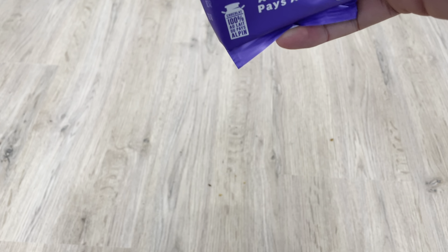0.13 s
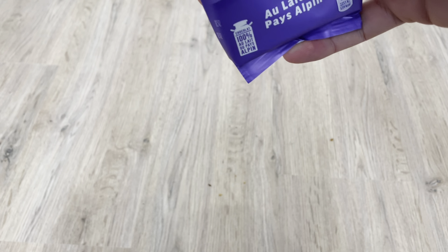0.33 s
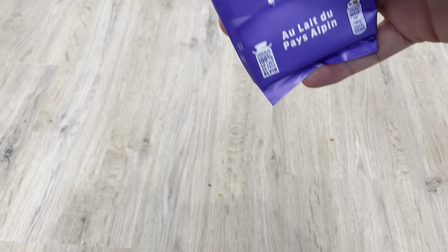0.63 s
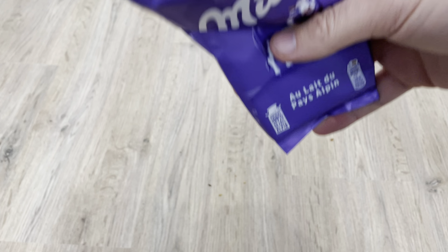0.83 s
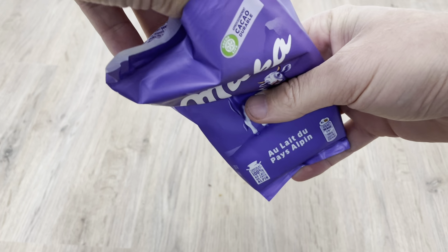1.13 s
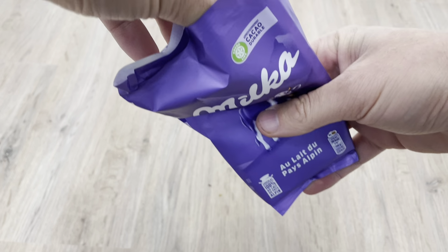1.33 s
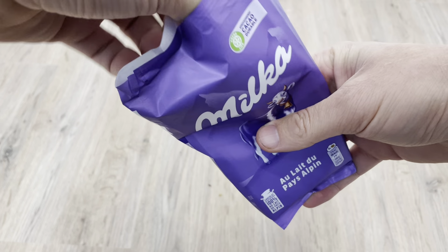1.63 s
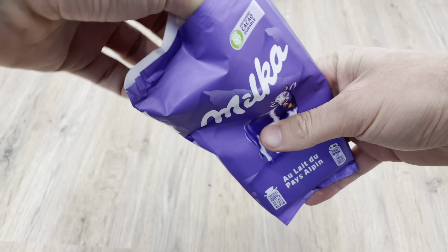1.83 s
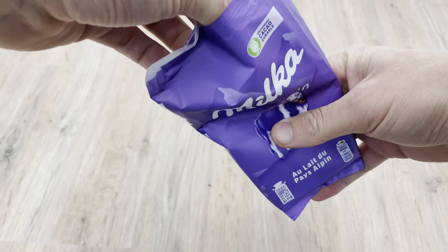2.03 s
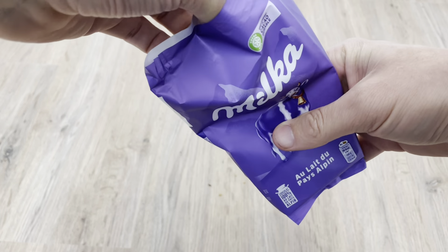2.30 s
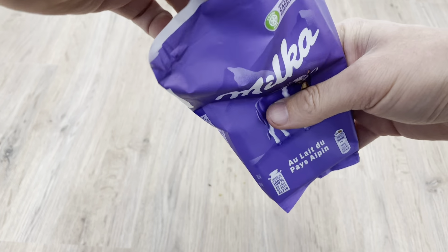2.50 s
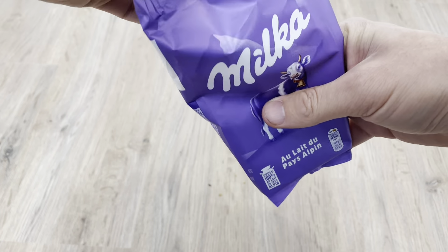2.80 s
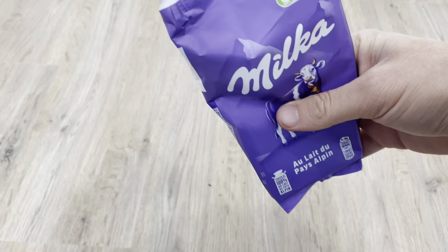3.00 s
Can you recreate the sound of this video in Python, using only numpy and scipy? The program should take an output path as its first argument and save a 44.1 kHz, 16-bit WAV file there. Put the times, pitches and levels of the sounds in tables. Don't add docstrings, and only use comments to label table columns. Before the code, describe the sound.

A stiff plastic snack bag is handled and opened: a dense loud burst of crackles first, then sparser snaps, ticks and rustling, with soft hollow thumps; close stereo phone microphone, small room.

```python
import sys
import numpy as np
from scipy import signal
from scipy.fft import rfft, irfft, next_fast_len
from scipy.io import wavfile
from scipy.ndimage import map_coordinates

SR = 44100
rng = np.random.default_rng(int(sys.argv[2]) if len(sys.argv) > 2 else 0)


def int16_out(signal):
    q = np.round(np.clip(np.atleast_2d(signal).T, -1, 1) * 32767)
    wavfile.write(sys.argv[1], SR, q.astype(np.int16))


def volts(x):
    e = np.asarray(x, float) / 20
    return 10 ** e


N = 138915

# f/Hz, level/dB
FILM_MODES = [(300, 9.5), (600, 6), (1300, 8), (3500, 6.5), (7000, 7), (12000, 5.5), (16500, -34)]


def unit(x):
    return x / np.sqrt(np.mean(x ** 2) + 1e-20)


def along(points, hz):
    f, v = np.transpose(points)
    return np.interp(np.log(hz + 1), np.log(f + 1), v)


def wobble(rate):
    knots = rng.standard_normal(int(N * rate / SR) + 4)
    return map_coordinates(knots, [np.arange(N) * rate / SR])


def filtered(x, response):
    m = next_fast_len(N + SR // 2)
    return irfft(rfft(x, m) * response(np.fft.rfftfreq(m, 1 / SR)), m)[..., :N]


def rings(start_s, hz, t60, db, size, sag=0):
    first = np.ceil(start_s * SR).astype(int)[:, None] + np.arange(size)
    t = first / SR - start_s[:, None]
    u = t / t60[:, None]
    turns = hz[:, None] * t
    swell = np.minimum(2 * turns, 1)
    phase = 2 * np.pi * turns * (1 - sag * np.minimum(u, 1) / 2)
    wave = volts(db[:, None] - 60 * u) * swell * np.sin(phase)
    return np.bincount(np.clip(first, 0, N).ravel(), wave.ravel(), N + 1)[:N]


def crease(s, db, pop_hz, low_db, high_db, colour, count, size):
    late_s, smear_s = .0024, .00055
    ring_cycles, ring_s = 3.2, .0013
    pop_lift_db, pop_width_oct = 8, .33
    draw = rng.random((len(s), count, 3))

    lowest, highest = colour[0][0], colour[-1][0]
    hz = lowest * (highest / lowest) ** ((np.arange(count) + draw[..., 0]) / count)
    low = np.clip(np.log2(2500 / hz), 0, 1)
    high = np.clip(np.log2(hz / 5000) * 2, 0, 1)
    pop = np.exp(-(np.log2(hz / pop_hz[:, None]) / pop_width_oct) ** 2)

    level = db[:, None] + along(colour, hz) + pop_lift_db * pop
    level += low * low_db[:, None] + high * high_db[:, None]
    level += 8 * (draw[..., 1] - .5)
    start = s[:, None] + late_s * (np.sqrt(1000 / hz) - .25) - smear_s * np.log(1 - draw[..., 2])
    t60 = (1 + pop) * ring_cycles / hz + ring_s
    return rings(start.ravel(), hz.ravel(), t60.ravel(), level.ravel(), size)


def hush():
    # f/Hz, level/dB per Hz
    spectrum = [(30, 2), (70, 0), (200, -10), (600, -24), (15000, -50)]
    noise = rng.standard_normal((2, N))
    return volts(-54) * unit(filtered(noise, lambda hz: volts(along(spectrum, hz))))


def rustle():
    # f/Hz, level/dB
    colour = [(130, -0.5), (250, -7), (600, -2), (2000, 0.5), (7000, -7.5), (11000, -1), (16500, -16)]
    # t/s, level/dB
    effort = [(0, -47.5), (.11, -47.5), (.16, -43.5), (.46, -41), (.62, -56), (.92, -52.5), (.97, -47),
              (1.48, -57.5), (1.679, -44.5), (1.93, -51), (2.02, -48.5), (2.139, -51.5), (2.218, -46.5),
              (2.38, -51.5), (2.65, -41.5), (2.801, -48), (2.869, -32.5), (3.082, -57)]
    count, spread_db, clump_db = 2500, 2.5, 3.5
    draw = rng.random((count, 4))
    clumps = wobble(24.91)[(draw[:, 0] * N).astype(int)]
    db = -spread_db * np.log(1 - draw[:, 1]) + clump_db * clumps
    pop_hz = 800 * 8 ** draw[:, 2]
    low_db, high_db = 12 * (draw[:, 2] - .5), 12 * (draw[:, 3] - .5)
    grains = unit(crease(draw[:, 0] * N / SR, db, pop_hz, low_db, high_db, colour, count=4, size=220))

    def friction(hz):
        return volts(along(FILM_MODES, hz) - 4.4 * np.log2(1 + hz / 2000))

    hiss = unit(filtered(rng.standard_normal(N), friction))
    slide = volts(-3.5 + 4.4 * wobble(14)) * hiss
    at, effort_db = np.transpose(effort)
    return (grains + slide) * volts(np.interp(np.arange(N) / SR, at, effort_db) - 1.5)


def walls(x):
    # f/Hz, t60/s
    decay = [(100, 0.22), (1000, 0.16), (6000, 0.23), (14000, 0.077)]
    step, delay = 4096, round(.000967 * SR)
    out = np.zeros((2, N + SR))
    for a in range(0, N, step):
        hz, t, z = signal.stft(rng.standard_normal((2, SR // 3)), SR, nperseg=256)
        fade = volts(-60 * t / along(decay, hz)[:, None])
        tail = signal.istft(z * fade, SR, nperseg=256)[1]
        wet = signal.fftconvolve(x[None, a:a + step], tail / np.linalg.norm(tail[0]), axes=1)
        out[:, a + delay:][:, :wet.shape[1]] += wet
    return volts(-11.5) * out[:, :N]


def thumps():
    # t/s, level/dB, f/Hz
    pushes = [(0.021, -31, 151), (0.15, -19, 290), (.166, -22.5, 105), (0.225, -31, 274),
              (0.309, -35.5, 130), (0.379, -31, 213), (0.399, -25.5, 526), (.443, -20, 230),
              (.951, -28, 322), (0.964, -37, 98), (1.009, -35.5, 160), (1.104, -36.5, 220),
              (1.257, -34, 125), (1.323, -30.5, 290), (1.444, -33.5, 432), (1.68, -32, 260),
              (1.793, -33, 178), (1.804, -19.5, 523), (1.831, -21.5, 604), (1.988, -30.5, 390),
              (2.548, -25.5, 188), (2.645, -30, 138), (2.705, -23.5, 300), (2.886, -35, 200),
              (2.98, -26, 180)]
    s, db, hz = np.transpose(pushes)
    return rings(s, hz, 7.08 / hz, db + 6.5, size=4000, sag=2.02)


def snaps():
    # t/s, peak level/dB, loudest mode f/Hz, low part level/dB, high part level/dB
    large = [(0.1353, -7, 970, -17, -7), (0.1493, -8.5, 1140, -26.5, -10), (0.1785, -11.5, 1050, -6, -4.5),
             (0.2249, 5.5, 1275, -23, -14), (0.282, -2, 1700, -16.5, -13), (0.3101, -15, 1370, -4.5, -4),
             (0.3461, -4, 3900, -22, -5), (0.4231, -16.5, 1640, 1, -1.5), (0.4275, -5.5, 2030, -23, -7),
             (0.4423, -9, 1340, -8, 1), (0.4479, -3.5, 1520, -14, -26), (0.4812, -10, 2480, -44, -3.5),
             (0.5329, -7, 1760, -24.5, -12), (0.7088, -5, 1390, -19, -13), (0.9532, -7, 4000, -10.5, 0.5),
             (1.0931, -6.5, 4830, -18, -5), (1.2513, -10.5, 4260, -11.5, -2),
             (1.5992, -6.5, 1700, -23, -31), (1.6352, -15, 2670, -8, 2), (1.697, -8.5, 4600, -20, -9),
             (1.8463, -8.5, 2100, -28, -18.5), (2.0393, -14.5, 2390, -8.5, -10.5),
             (2.2952, -13, 1510, -7, -8), (2.9031, -6, 1610, -29, -58)]
    # t/s, peak level/dB, loudest mode f/Hz, high part level/dB
    middling = [(0.1252, -11, 1720, -30), (0.352, -11, 1320, -27), (0.397, -11, 1250, -21),
                (0.464, -11, 1900, -8), (0.927, -16, 3200, -16), (0.947, -9, 6100, -23),
                (1.206, -21, 2360, -8.5), (1.2863, -12, 1210, -12.5), (1.611, -16.5, 3270, -14),
                (1.662, -10, 1730, -12), (1.691, -13, 4700, -10.5), (1.738, -14.5, 3250, -11),
                (1.803, -13, 1310, -13.5), (2.001, -17.5, 1960, -12.5), (2.006, -14.5, 1880, -49),
                (2.0335, -13, 2220, -16), (2.194, -21.5, 2900, -4.5), (2.276, -17, 1880, -40),
                (2.428, -20, 700, -9), (2.462, -15.5, 3900, -24), (2.519, -13.5, 1210, -15),
                (2.529, -17.5, 2570, -3.5), (2.548, -20, 2350, -24), (2.638, -20, 3460, -32),
                (2.869, -12.5, 2580, -6.5), (2.945, -9, 1670, -8), (2.982, -12, 1100, -11)]
    # t/s, peak level/dB, loudest mode f/Hz
    small = [(0.024, -24, 1850), (0.075, -23, 1180), (0.671, -24.5, 1820), (0.809, -28.5, 2920),
             (0.843, -31, 1200), (0.895, -20.5, 980), (1.3247, -19.5, 2700), (1.404, -20, 1180),
             (1.497, -31.5, 1090), (1.553, -22, 760), (1.792, -27, 670), (1.831, -11.5, 616),
             (2.411, -26, 630), (2.625, -17.5, 1410), (2.67, -21, 2270), (2.7035, -15.5, 586),
             (2.722, -22, 2600), (2.771, -23, 920), (2.842, -16, 1900)]
    # t/s, peak level/dB, loudest mode f/Hz, high part level/dB
    ticks = [(0.0218, -25, 664, -18.5), (0.0985, -32.5, 880, -5), (0.119, -35, 1640, -20),
             (0.162, -18, 4480, -9), (0.171, -27, 1310, -19), (0.2467, -24, 3370, -24),
             (0.297, -21.5, 4770, -5), (0.6455, -40, 880, -26), (0.7036, -22, 980, -22),
             (0.7414, -27.5, 1530, -20), (0.8219, -39.5, 2800, 3.5), (0.8327, -33.5, 2670, -21),
             (0.8527, -27.5, 1570, -15), (0.9874, -20.5, 5830, -15), (1.009, -25, 1050, -9),
             (1.0403, -27, 1720, -25), (1.16, -32.5, 1290, -10), (1.268, -27, 6160, -10),
             (1.562, -45, 650, -30), (1.5957, -18, 1860, -28), (1.7178, -26.5, 1170, -25),
             (1.7878, -22, 1420, -34), (1.7938, -23, 4400, -22), (1.8812, -30, 2230, -7.5),
             (1.9543, -30, 1150, -26), (1.967, -33, 2540, -26), (1.9732, -35, 1270, -30),
             (1.9833, -37, 6000, -7), (2.0418, -22, 1170, -15), (2.062, -48, 1400, -27),
             (2.073, -35, 2420, -28), (2.085, -29, 1500, -28), (2.1045, -37, 2890, -33),
             (2.1359, -45, 2730, -13), (2.1773, -29, 1260, -8), (2.228, -29, 1660, -7),
             (2.2524, -43, 1790, 0), (2.2829, -21.5, 1210, -21), (2.2987, -17, 1440, -17),
             (2.345, -28.5, 1700, -19), (2.3857, -35.5, 2860, -31), (2.447, -39, 520, -28),
             (2.512, -37, 4410, -23), (2.5605, -29.5, 4300, -7), (2.6147, -38, 1340, -19),
             (2.6434, -28, 1520, -16), (2.6823, -35.5, 4260, -12), (2.6957, -21.5, 1210, -16),
             (2.7631, -29.5, 4360, -14), (2.8447, -20, 1190, -20)]
    large_low_db, other_low_db, lift_high_db = 8, -7, 12.5
    rows = [(s, db, hz, low + large_low_db, high + lift_high_db) for s, db, hz, low, high in large]
    rows += [(s, db, hz, other_low_db, high + lift_high_db) for s, db, hz, high in middling]
    rows += [(s, db, hz, -3, -12) for s, db, hz in small]
    rows += [(s, db + 3.5, hz, other_low_db, high + lift_high_db) for s, db, hz, high in ticks]
    s, db, hz, low_db, high_db = np.transpose(rows)
    db = db - 18.5
    film = crease(s, db, hz, low_db, high_db, FILM_MODES, count=50, size=400)

    from_s, to_s = -.0013, .022
    for d in rng.random((3, len(s), 3)):
        near_s = s + from_s + (to_s - from_s) * d[:, 0]
        near_db = db - 23.5 + 10 * d[:, 1]
        near_hz = hz * 3 ** (d[:, 2] - .5)
        film += crease(near_s, near_db, near_hz, low_db, high_db, FILM_MODES, count=14, size=300)
    return filtered(film, lambda f: (1j * f / (250 + 1j * f)) ** 2)


def panels():
    # t/s, peak level/dB, f/Hz
    patches = [
        (0.281, -15.5, 1780),
        (0.534, -22.5, 1770),
        (1.288, -25, 1150),
        (1.405, -30, 1170),
        (1.496, -32.5, 1060),
        (2.039, -26, 2320),
    ]
    s, db, hz = np.transpose(patches)
    start, t60 = s + .00137, 33 / hz
    main = rings(start, hz, t60, db + 1, size=900)
    neighbour = rings(start, hz * 1.07, t60, db - 18.5, size=900)
    return main + neighbour


def scene():
    # f/Hz, level/dB
    apart = [(60, -15.5), (300, -1.5), (1000, 1.5), (5000, 2), (8000, -2.5)]
    bag = rustle() + thumps() + snaps() + panels()
    room = walls(bag) + hush()
    same = bag + room[0]
    unlike = filtered(room[1], lambda hz: volts(along(apart, hz)))
    return np.array([same + unlike, same - unlike])


def band_limit(x):
    return signal.sosfilt(signal.butter(12, 17000, fs=SR, output="sos"), x)


def record(dry):
    # f/Hz, phase/rad
    lead = [(0, 0), (1500, .9), (3500, .7), (5900, 0), (8300, -3.14), (11600, -6.28), (14900, -9.42),
            (17000, -11.4)]
    # f/Hz, level/dB
    lean = [(100, -.6), (350, .2), (700, 1.6), (2800, 3), (5500, 2.3), (7500, 0)]
    side = np.array([[.5], [-.5]])

    def ports(hz):
        phase = np.exp(1j * side * np.interp(hz, *np.transpose(lead)))
        level = volts(side * along(lean, hz))
        low_pass = 1 / (1 + (hz / 15900) ** 50)
        high_pass = hz ** 4 / (hz ** 4 + 55 ** 4)
        return phase * level * low_pass * high_pass

    mix = filtered(dry, ports)
    return band_limit(mix)


dry = scene()
out = record(dry)
int16_out(out)
```